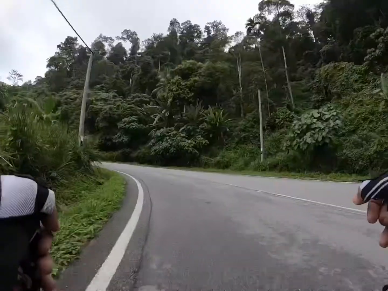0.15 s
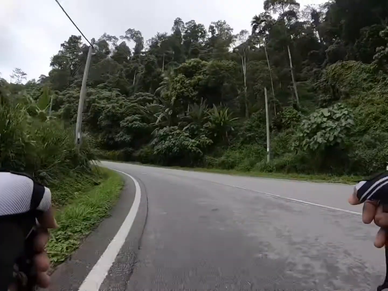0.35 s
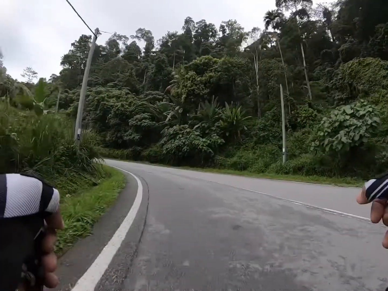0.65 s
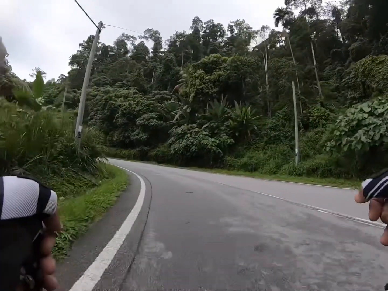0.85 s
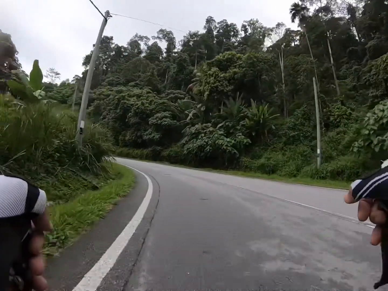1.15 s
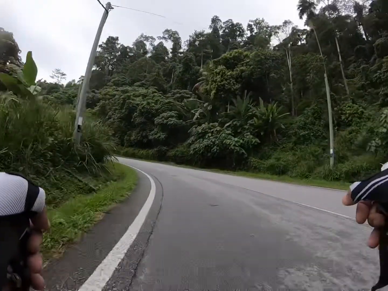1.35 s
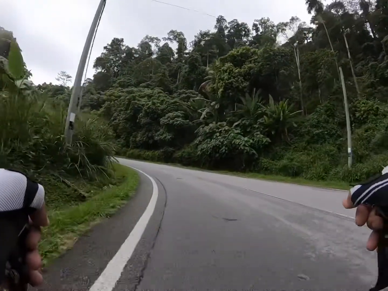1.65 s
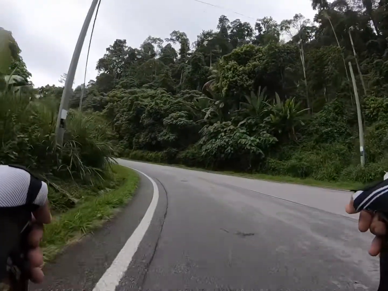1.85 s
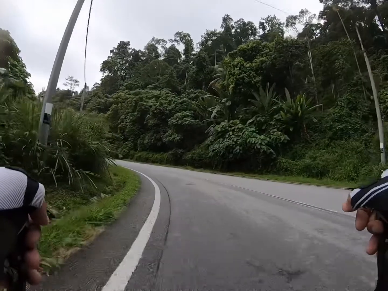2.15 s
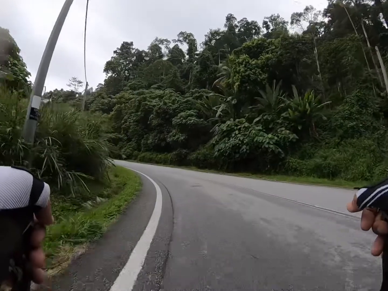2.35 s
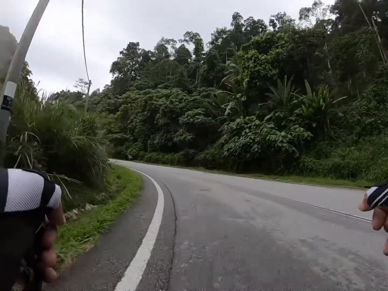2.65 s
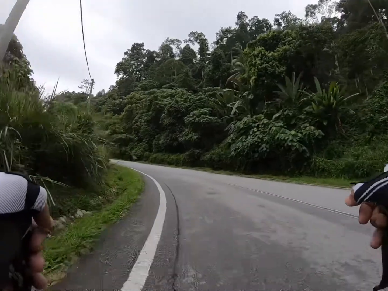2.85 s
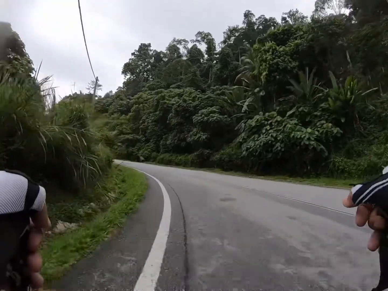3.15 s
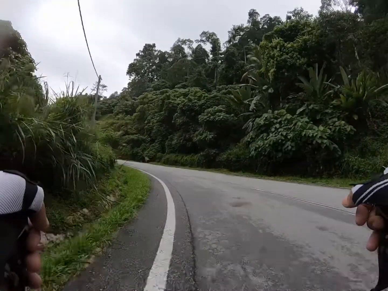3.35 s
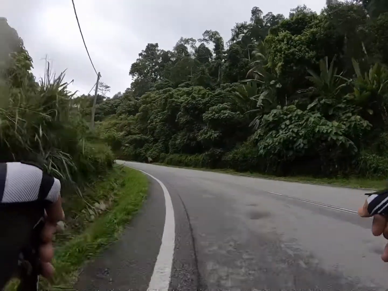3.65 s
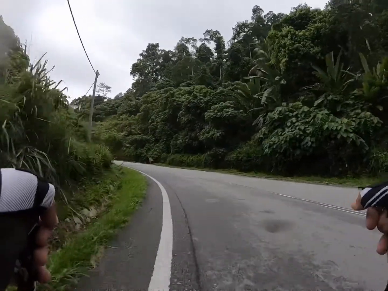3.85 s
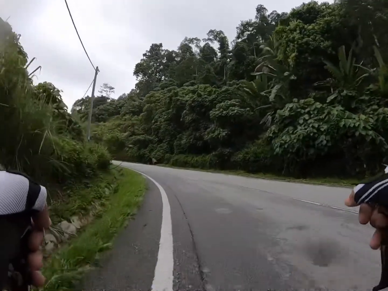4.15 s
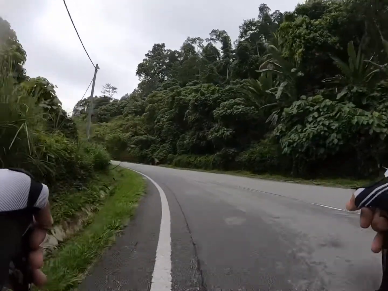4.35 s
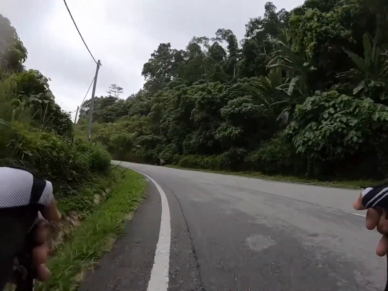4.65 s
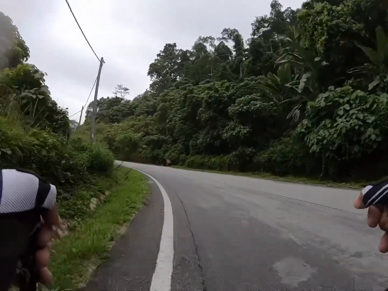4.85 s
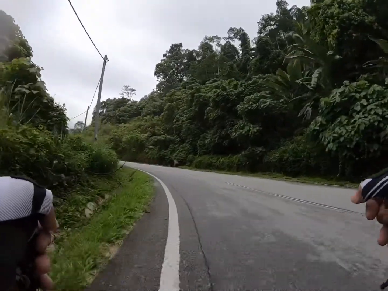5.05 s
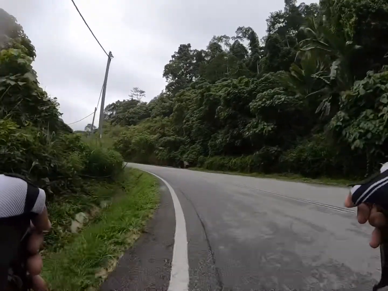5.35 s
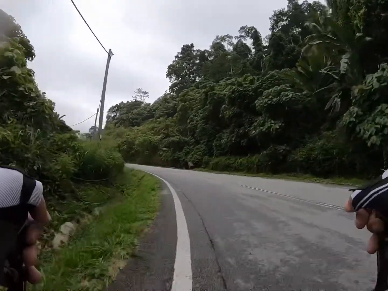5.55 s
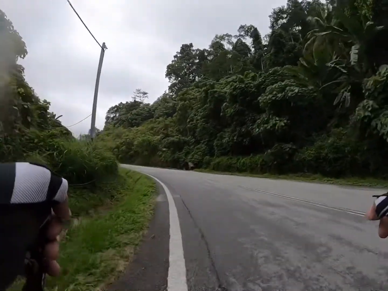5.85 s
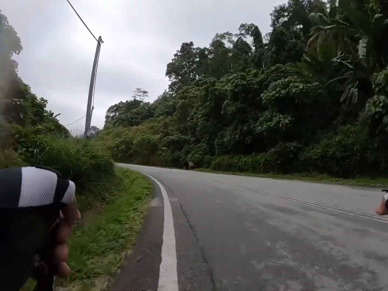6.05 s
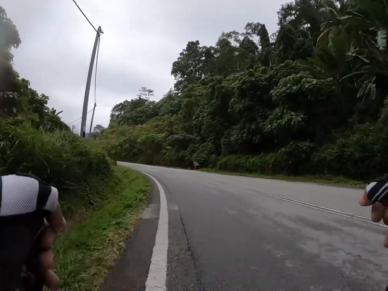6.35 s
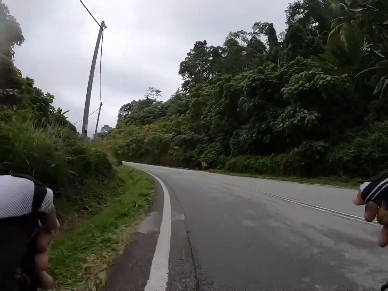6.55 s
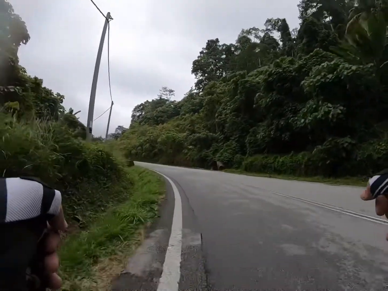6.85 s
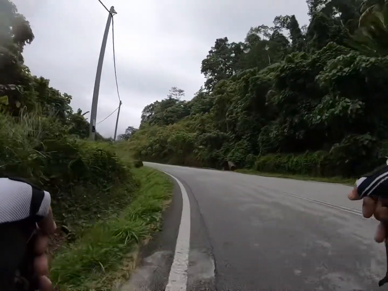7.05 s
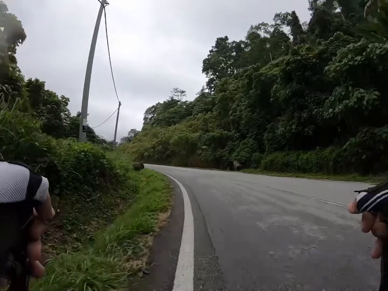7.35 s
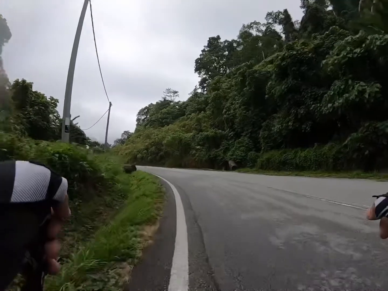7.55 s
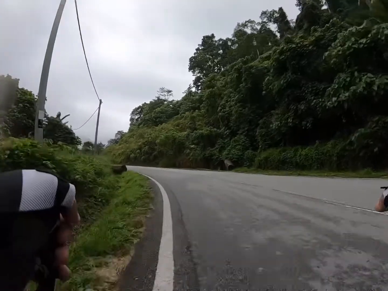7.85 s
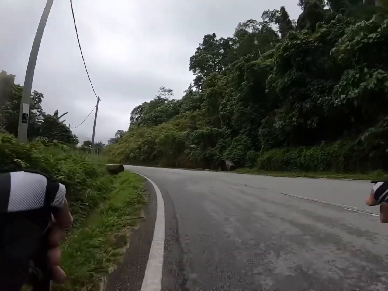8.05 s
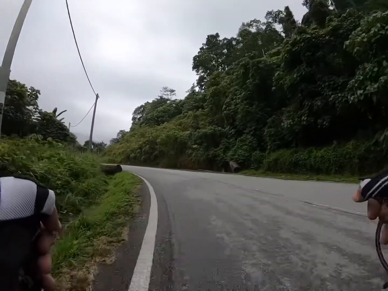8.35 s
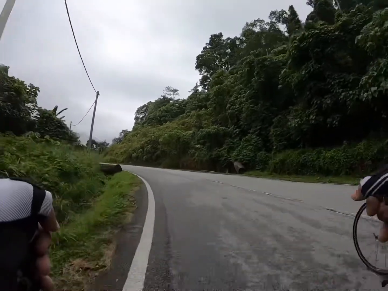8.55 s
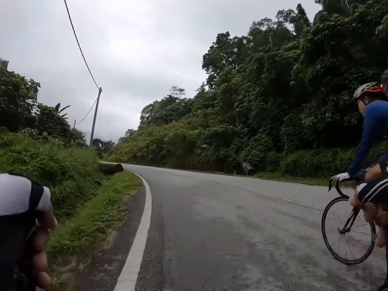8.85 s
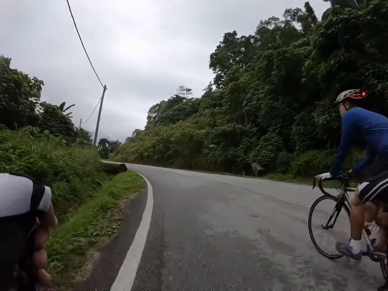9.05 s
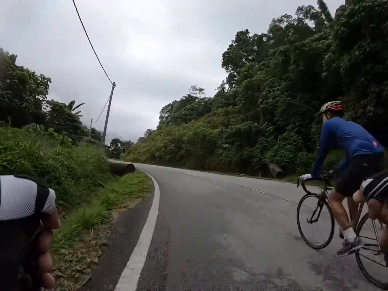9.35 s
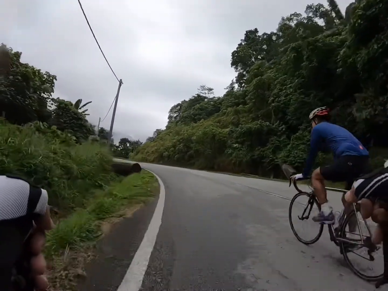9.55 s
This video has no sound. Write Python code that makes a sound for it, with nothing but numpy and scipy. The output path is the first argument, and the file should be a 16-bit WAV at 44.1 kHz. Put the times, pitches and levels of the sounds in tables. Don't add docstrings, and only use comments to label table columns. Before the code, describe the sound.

A camera fixed to a road bicycle hears a throbbing low hum from its mount, steady tyre roar on asphalt and headwind thumping the microphone, strongest in the first three seconds. A crank double click returns about every 0.9 seconds among irregular dull chain knocks. Faint insects buzz at the roadside, small bird chirps pass near the middle, and bright grit ticks grow more frequent later. Open forest road, very close mono sound.

```python
import sys
import numpy as np
from scipy import signal
from scipy.io import wavfile
from scipy.ndimage import uniform_filter1d

SR = 44100
rng = np.random.default_rng(int(sys.argv[2]) if len(sys.argv) > 2 else 0)


def convert_level_to_amplitude(level_db):
    exponent = np.asarray(level_db, float) / 20
    return 10 ** exponent


def generate_wav(sig):
    pcm = np.round(np.clip(np.atleast_2d(sig).T, -1, 1) * 32767).astype(np.int16)
    wavfile.write(sys.argv[1], SR, pcm)


N = 427769
T = np.arange(N) / SR


def evened(x):
    return x / np.sqrt(np.mean(abs(x) ** 2) + 1e-20)


def smoothed(x, size):
    return uniform_filter1d(uniform_filter1d(x, size), size)


def column(rows, order):
    rows = np.array(rows)
    return np.interp(T, rows[:, 0], rows[:, order])


def read(points, hz):
    f, value = np.transpose(points)
    return np.interp(np.log(hz + 1), np.log(f + 1), value)


def add(mix, s, sound):
    part = mix[round(s * SR):][:len(sound)]
    part += sound[:len(part)]


def bandpass(x, low_hz, high_hz):
    return signal.sosfilt(signal.butter(3, [low_hz, high_hz], "band", fs=SR, output="sos"), x)


def ring(modes, detune=1, rise=0.00022):
    t = T[:3000]
    x = 0
    for (hz, db, t60), d in zip(modes, detune * np.ones(len(modes))):
        x = x + convert_level_to_amplitude(db - 60 * t / t60) * np.sin(2 * np.pi * hz * d * t)
    x = x * (1 - np.exp(-(t / rise) ** 2))
    return x / abs(x).max()


def noise(colour_db, size, patchy_db, flicker_db):
    hz, frames = np.fft.rfftfreq(size, 1 / SR), 4 * N // size + 5
    a, b, patches = rng.standard_normal((frames, len(hz), 3)).T
    patches = evened(uniform_filter1d(uniform_filter1d(patches, 16, 0), 8, 1))
    flicker = evened(uniform_filter1d(rng.standard_normal(frames), 3))
    z = (a + 1j * b) * convert_level_to_amplitude(colour_db(hz)[:, None] + patchy_db * patches + flicker_db * flicker)
    return evened(signal.istft(z, nperseg=size, noverlap=3 * size // 4)[1][:N])


def swells(rows, idle_db, rise_s, fall_s, climb_db=0.):
    t, power = T[::32], 0
    for s, length, db in rows:
        shape = np.clip(np.minimum((t - s) / rise_s + .5, (s + length - t) / fall_s + .5), 0, 1)
        climb = climb_db * np.clip(2 * (t - s) / length - 1, -1, 1)
        power = power + (shape * convert_level_to_amplitude(db + climb)) ** 2
    return np.sqrt(convert_level_to_amplitude(idle_db) ** 2 + uniform_filter1d(np.interp(T, t, power), size=128))


def links_passed():
    s = np.array(CRANK_CLICKS)[:, 0]
    s = np.concatenate([[2 * s[0] - s[1]], s, [2 * s[-1] - s[-2]]])
    turns = np.interp(T, s, np.arange(len(s)))
    return 34 * turns + .8


# (start t/s, length t/s, level/dB)
CLAMP_SURGES = [(0, 0.033, -11.5), (.13, 0.046, -14.5), (.43, 0.14, -16.5), (.28, 0.037, -29),
                (.73, 0.069, -16), (.84, 0.057, -16), (.95, .06, -18), (1.16, 0.35, -28.5),
                (1.61, 0.17, -24), (1.92, 0.18, -19.5), (2.15, 0.042, -18), (2.31, 0.22, -18),
                (2.66, 0.043, -26), (2.79, 0.062, -18.5), (2.87, 0.054, -18), (3.07, 0.11, -20.5),
                (3.27, 0.17, -15.5), (3.42, 0.15, -23.5), (3.6, 0.24, -16), (3.92, 0.14, -17.5),
                (4.11, 0.18, -15.5), (4.34, 0.17, -19.5), (4.6, 0.24, -16.5), (4.9, 0.15, -18.5),
                (5.11, 0.239, -16), (5.445, 0.23, -17.5), (5.89, 0.24, -14.5), (6.15, 0.473, -17),
                (6.76, 0.31, -16), (7.12, 0.355, -17.5), (7.55, 0.25, -18), (7.87, 0.063, -15),
                (8.02, 0.29, -16.5), (8.35, 0.14, -22.5), (8.92, 0.138, -19), (9.3, 0.26, -20.5)]


def mount():
    pitch_hz, width_hz = 127.86, 17.0
    r = np.exp(-np.pi * width_hz / SR)
    shake = [1, 1j] @ rng.standard_normal((2, N))
    shake = evened(signal.lfilter([1], np.convolve([1, -r], [1, -r]), shake))
    shake = shake / (abs(shake) + 0.085) ** 0.56
    surge = swells(CLAMP_SURGES, idle_db=-26.5, rise_s=0.066, fall_s=0.0083, climb_db=1.5)
    swing = surge * evened(shake) * np.sqrt(2)
    swing = signal.sosfiltfilt(signal.butter(2, 36, fs=SR, output="sos"), swing)
    return (swing * np.exp(2j * np.pi * pitch_hz * T)).real


GUST_RISE_S, GUST_FALL_S = 0.013, 0.069
# (t/s, wind level/dB, reach to the case level/dB)
HEADWIND = [(0, -27, -31.5), (1.0, -26, -39.5), (1.7, -22, -37), (3.4, -24.5, -41.5), (3.65, -24, -43),
            (5.0, -22.5, -54.5), (5.5, -23.5, -43), (6.5, -25.5, -51.5), (7.9, -25.5, -49),
            (8.1, -28, -53.5), (9.7, -28.5, -39)]
# (start t/s, length t/s, level/dB)
AIR_LUMPS = [(.135, 0.056, -19), (.235, 0.072, -14.5), (.65, 0.086, -18.5), (1.27, .18, -25.5),
             (1.62, 0.17, -22), (2.44, 0.07, -21), (3.35, 0.08, -25), (5.07, .05, -22), (5.25, 0.11, -28),
             (5.33, 0.21, -19.5), (7.28, 0.11, -21.5), (7.61, 0.042, -18), (7.83, 0.22, -22),
             (9.17, .07, -23)]
# (f/Hz, level/dB per Hz)
WIND_COLOUR = [(8.8, -39), (15, -16), (43, 14), (86, 7), (100, 12), (130, -34), (220, -120)]


def wind():
    lumps = noise(lambda hz: read(WIND_COLOUR, hz), size=4096, patchy_db=-5.5, flicker_db=1.8)
    size = np.sqrt(abs(smoothed(lumps ** 2, 1800)))
    steady = evened(lumps / (size + 0.18) ** 0.87)
    return swells(AIR_LUMPS, column(HEADWIND, order=1), GUST_RISE_S, GUST_FALL_S) * steady


# (t/s, level/dB)
ASPHALT = [(0.0, -27.5), (0.1, -33.5), (1.59, -33), (1.65, -31), (1.84, -33.5), (3.65, -31.5),
           (4.59, -35.5), (4.62, -33.5), (8.05, -34.5), (8.21, -36), (9.56, -30.5), (9.7, -33)]
# (f/Hz, level/dB per Hz)
ROAR_COLOUR = [(90, -2.5), (150, 0), (200, -14.5), (260, -23.5), (520, -22), (1100, -28), (1700, -33.5),
               (3400, -39.5), (5600, -44.5), (7000, -45.5), (9500, -58), (10500, -77), (13000, -89.5),
               (16000, -118)]
# (f/Hz, width f/Hz, lift or dip level/dB)
FRAME_MODES = [(304, 69, 4), (313.3, 66, 9), (389.7, 59, 17.5), (420, 8.6, 2.5), (454.8, 46, 22.5),
               (578.7, 38, 11), (604, 13, -6.5), (710, 96, 7.5), (916, 130, 9), (1094, 82, -6),
               (1248, 110, 10), (1477, 20, 6.5), (1920, 170, 2.5), (2700, 52, 4), (3700, 140, 2),
               (4515, 260, 5), (6230, 110, 7.5), (6870, 300, -18), (7900, 240, 2), (8950, 200, 1.5)]


def road():
    def colour_db(hz):
        bumps = sum(db / (1 + (2 * (hz - f) / w) ** 2) for f, w, db in FRAME_MODES)
        return read([(40, -51.5)] + ROAR_COLOUR, hz) + bumps
    roar = noise(colour_db, size=4096, patchy_db=1.37, flicker_db=0.86)
    return convert_level_to_amplitude(column(ASPHALT, order=1) + 3.0) * roar


# (f/Hz, level/dB, t60 t/s)
LINK_MODES = [(1358, 5.5, 0.017), (1800, -1.5, 0.015), (2080, -3, 0.021), (2750, -9, 0.046),
              (3003, -7, 0.044), (3630, -9.5, 0.039), (4620, -8.5, 0.014), (5860, -10, 0.022),
              (9100, -22, 0.0098)]
# (t/s, level/dB)
CHAIN_TENSION = [(0, -59), (.66, -60.5), (2.0, -59.5), (3.0, -58.5), (3.4, -62), (8.0, -62), (8.4, -61.5),
                 (9.7, -58.5)]


def chain_links():
    at = np.flatnonzero(np.diff(np.floor(links_passed())) > 0).repeat(3)
    size, late, kind = rng.random((len(at), 3)).T
    out = np.zeros(N)
    for k in range(8):
        train, mine = np.zeros(N + 900), (8 * kind).astype(int) == k
        train[at[mine] + (340 * late[mine] ** 2).astype(int)] = convert_level_to_amplitude(10. * size[mine])
        modes = [(hz, db + 15.0 * rng.random(), t60) for hz, db, t60 in LINK_MODES]
        knock = ring(modes, rng.uniform(.94, 1.06, len(LINK_MODES)), rise=.0005)
        out += signal.oaconvolve(train, knock)[:N]
    return convert_level_to_amplitude(column(CHAIN_TENSION, order=1) + 6.5) * evened(out)


# (start t/s, length t/s, level/dB)
PLATE_RUBS = [(0, 0.056, -56), (.33, 0.088, -61), (4.35, .06, -57), (5.17, 0.28, -74), (1.0, 0.3, -55.5),
              (2.1, 0.33, -60), (3.3, 0.2, -52.5), (4.58, 0.2, -55.5), (5.7, 2.7, -64.5),
              (8.05, 0.21, -57.5), (8.85, 0.23, -52.5), (9.45, 0.38, -62)]


def chain_rub():
    def colour_db(hz):
        return -20 * np.log10(1 + ((hz - 2900) / 300) ** 2)
    rub = noise(colour_db, size=512, patchy_db=1.5, flicker_db=1.5)
    pulse = 0.92 + 0.92 * np.cos(np.pi * (links_passed() - .12)) ** 6
    return swells(PLATE_RUBS, idle_db=-76.5, rise_s=0.28, fall_s=0.17) * rub * pulse


# (t/s, level/dB)
SAND = [(0, -80), (1.1, -82), (1.3, -85), (1.75, -86), (1.92, -97), (2.3, -87), (2.5, -95), (2.7, -88),
        (3.2, -87.5), (3.9, -81), (4.15, -83.5), (4.4, -92), (4.55, -81.5), (5.8, -85), (6.05, -78),
        (8.3, -78), (8.7, -81.5), (9.7, -76.5)]


def spray():
    colour = [(6000, -60), (8500, -10), (10300, -2), (11500, -6), (13300, -12), (14400, -21),
              (15300, -40), (16000, -80)]
    hiss = noise(lambda hz: read(colour, hz), size=1024, patchy_db=2., flicker_db=3.)
    return convert_level_to_amplitude(column(SAND, order=1) + 3.5) * hiss


# (f/Hz, width f/Hz, pulse rate f/Hz, mid-buzz pitch rise f/Hz, unsteadiness,
# share of clean tone)
INSECT_KINDS = [
    (11600, 1800, 150, 500, .08, 0),
    (9050, 800, 140, 0, .012, 1.2),
    (4500, 400, 90, 0, .03, 0),
    (10500, 300, 140, 0, .05, 0),
    (10900, 500, 150, 1400, .08, 0),
    (8950, 800, 120, 100, .04, 0),
]
# (start t/s, end t/s, level/dB, kind)
BUZZES = [(.05, .38, -77, 0), (.52, .66, -73, 1), (.63, .755, -68, 1), (.55, .72, -79, 3),
          (.8, 1.03, -79, 4), (.8, 1.05, -81, 0), (.43, .53, -78, 0), (2.2, 2.45, -73, 5),
          (3.08, 3.38, -70, 5), (3.96, 4.05, -76, 5), (6.2, 6.4, -75, 5), (5.8, 5.97, -65, 2),
          (0, 3.6, -63.5, 2), (7.4, 8.6, -70, 2), (8.15, 8.19, -60, 2)]


def insects():
    out = np.zeros(N)
    for start, end, db, kind in BUZZES:
        hz, width, rate, arch_hz, jitter, clean = INSECT_KINDS[kind]
        t = T[:round((end - start) * SR)]
        low = signal.butter(3, width / 2, fs=SR, output="sos")
        band = signal.sosfilt(low, rng.standard_normal((2, len(t))))
        turn = 2 * np.pi * np.cumsum(hz + arch_hz * np.sin(np.pi * t / t[-1])) / SR
        band = (band[0] + clean * band.std()) * np.cos(turn) + band[1] * np.sin(turn)
        stray = jitter * np.cumsum(rng.standard_normal(len(t)))
        pulses = 0.39 + np.cos(2 * np.pi * rate * t + stray)
        add(out, start, convert_level_to_amplitude(db) * evened(band * pulses) * signal.windows.tukey(len(t), .3))
    return out


# (start t/s, length t/s, level/dB)
CASE_SLAPS = [(.014, 0.19, -37), (.13, 0.043, -27), (.235, 0.04, -23.5), (.55, .03, -39), (.78, .08, -29),
              (1.355, .03, -31), (1.44, 0.037, -32.5), (1.61, 0.046, -29), (1.685, 0.027, -38),
              (2.1, 0.09, -37), (2.49, .03, -36), (2.57, 0.036, -32.5), (3.1, 0.035, -32),
              (4.2, 0.083, -39), (4.5, 0.11, -42), (6.11, 0.026, -34), (2.815, .03, -30.5),
              (.975, 0.038, -26), (1.13, .07, -27), (1.28, 0.063, -28), (1.76, .15, -34),
              (1.96, 0.13, -31.5), (2.3, .15, -30.5), (2.78, .04, -30), (2.9, 0.084, -24),
              (3.17, 0.39, -33), (5.31, 0.092, -38), (5.42, 0.079, -26), (5.94, 0.025, -33),
              (7.68, 0.07, -41), (8.925, 0.049, -29), (9.385, 0.077, -28), (9.525, 0.047, -39)]


def buffet():
    colour = [(60, -27.5), (150, 19.0), (215, 2.0), (290, -4.0), (500, -17), (1500, -110)]
    slaps = noise(lambda hz: read(colour, hz), size=1024, patchy_db=0.0, flicker_db=3.0)
    gain = swells(CASE_SLAPS, column(HEADWIND, order=2), GUST_RISE_S, GUST_FALL_S)
    return convert_level_to_amplitude(3.5) * gain * slaps


# (t/s, peak level/dB)
GRIT_TICKS = [(.127, -58), (.8195, -59.5), (2.591, -56), (3.1193, -56), (3.7748, -53), (4.5501, -56),
              (4.57, -56.5), (6.59, -51), (6.665, -57), (7.1342, -55.5), (7.3312, -52), (7.3547, -54.5),
              (7.4599, -53), (7.4974, -54.5), (7.815, -60), (7.858, -56), (8.04, -60), (8.098, -53),
              (8.128, -59), (8.1673, -55), (8.186, -59.5), (8.6971, -56.5), (9.0214, -54.5), (9.3177, -53),
              (9.3901, -54), (1.026, -53), (1.1727, -56), (2.784, -48.5), (3.4266, -46), (3.4445, -47.5),
              (3.686, -49), (3.7155, -46.5), (4.5161, -50), (5.021, -64), (5.3852, -59), (5.7139, -55),
              (6.0806, -53.5), (6.1689, -49), (6.339, -51.5), (6.738, -52.5), (6.8577, -51.5),
              (6.9554, -50), (7.0616, -57), (7.1713, -53), (7.212, -50.5), (7.3153, -56.5), (7.39, -49),
              (7.7146, -51), (7.912, -52.5), (8.9146, -48), (9.2798, -52), (9.426, -48), (9.4728, -41.5),
              (9.5178, -52)]


def grit():
    out, t = np.zeros(N), T[:1200]
    snaps = bandpass(rng.standard_normal((len(GRIT_TICKS), len(t))), 5000, 11000)
    for (s, db), hz, snap in zip(GRIT_TICKS, rng.uniform(7100, 9300, len(GRIT_TICKS)), snaps):
        modes = [(hz, 0, .013), (1.4 * hz, -12, .006), (1.0 * hz, -4, .008), (0.97 * hz, -4, .006),
                 (0.64 * hz, -6, .006)]
        add(out, s, convert_level_to_amplitude(db - 2.5) * ring(modes, rise=0.00074))
        add(out, s, convert_level_to_amplitude(db - 3.5 - 1400 * t) * snap * np.minimum(t / 0.00092, 1))
    return out


# (t/s, peak level/dB, f/Hz)
CHAIN_KNOCKS = [(0.344, -35, 3020), (0.371, -41.5, 3000), (.396, -37.5, 3000), (.421, -37, 2930),
                (0.8167, -33.5, 3550), (0.9924, -33, 2750), (1.1703, -37, 2680), (1.2206, -39, 2750),
                (1.476, -37.5, 3700), (1.625, -32, 3700), (2.1316, -36, 2920), (2.798, -49, 1960),
                (3.1209, -29.5, 1980), (3.4262, -26.5, 3140), (3.443, -29, 1670), (3.7264, -30.5, 1740),
                (3.762, -32.5, 1990), (4.383, -36, 2700), (4.7052, -45, 2800), (5.1167, -37.5, 3620),
                (5.1852, -45, 1840), (5.255, -31.5, 2600), (5.5882, -31, 3570), (5.6241, -33, 2080),
                (6.8647, -30, 2020), (8.1223, -37, 1700), (9.031, -35, 1800), (9.2848, -39, 1990),
                (9.427, -32, 2880), (.149, -36, 1510), (0.8676, -34, 1600), (1.5747, -38, 2900),
                (1.725, -38, 2900), (1.93, -39, 3000), (2.0038, -43.5, 2900), (2.0303, -43.5, 2800),
                (2.0542, -38, 2800), (2.1034, -35.5, 2820), (2.156, -38, 2010), (2.5362, -40, 1960),
                (2.8228, -42.5, 1880), (2.8444, -40.5, 2260), (2.9751, -39, 2000), (3.2136, -37.5, 3690),
                (3.2365, -40, 2500), (3.6745, -39, 1910), (3.8292, -40, 1850), (4.625, -39.5, 3230),
                (4.655, -42, 2700), (4.7282, -48, 2800), (4.7511, -46, 1900), (5.305, -41, 3000),
                (6.455, -41, 2800), (6.61, -43, 2950), (6.665, -46.5, 2900), (6.691, -52, 1490),
                (6.7366, -44.5, 4640), (8.1569, -32.5, 2500), (8.982, -33, 2960), (9.333, -41, 1900)]


def knocks():
    out, t = np.zeros(N), T[:1200]
    rattles = bandpass(rng.standard_normal((len(CHAIN_KNOCKS), len(t))), 1800, 4200)
    for (s, db, hz), rattle in zip(CHAIN_KNOCKS, rattles):
        modes = [(hz, 0, .024), (0.68 * hz, -7, .012), (1.3 * hz, -7, .012), (1.4 * hz, -9, .01),
                 (1.6 * hz, -14, .008)]
        add(out, s, convert_level_to_amplitude(db - 3.5) * ring(modes, rise=0.00073))
        add(out, s, convert_level_to_amplitude(db - 5.0 - 490 * t) * rattle * signal.windows.tukey(len(t), .05))
    return out


# (f/Hz, level/dB, t60 t/s)
CLICK_MODES = [(1980, 0, .016), (2150, -5, .014), (3165, -13, .012), (3790, -6, .024), (6150, -19, .014),
               (8250, -17, .014), (9000, -17, .013), (11000, -30, .01)]
# (f/Hz, level/dB, t60 t/s)
SEAT_MODES = [(1960, -2.5, 0.048), (2150, -2.5, 0.029), (3760, -10.5, 0.028)]
# (t/s, peak level/dB, second click against the first level/dB, brightness level/dB)
CRANK_CLICKS = [(0.4631, -27.5, -7, 0.5), (1.317, -28, -7, 0), (2.176, -27.5, -5.5, 1),
                (3.049, -27.5, -6, 1), (3.924, -30.5, -11, 1), (4.8015, -32, -9, 5.5), (5.6753, -29, -8, 2),
                (6.5525, -31.5, -8, 2), (7.4192, -33, -8, 2), (8.269, -35, -3, 6), (9.1255, -31, -2, 6)]


def crank():
    out, t = np.zeros(N), T[:1500]
    scrapes = rng.standard_normal((len(CRANK_CLICKS), len(t)))
    scrapes = signal.lfilter([1, 1.1, -.8, -.9], [1, -.85, .13], scrapes)
    scrape_shape = np.minimum(t / .001, 1) * np.cos(np.linspace(0, np.pi / 2, len(t)))
    draws = rng.random((len(CRANK_CLICKS), 20))
    for (s, db, second_db, bright_db), draw, scrape in zip(CRANK_CLICKS, draws, scrapes):
        struck = [(hz, level + 3.8 * (d - .5) + bright_db * (hz > 5000), t60)
                  for (hz, level, t60), d in zip(CLICK_MODES, draw[8:16])]
        add(out, s, convert_level_to_amplitude(db + 1.0) * ring(struck, .98 + 0.036 * draw[:8], rise=0.00096))
        seated = ring(SEAT_MODES, .98 + 0.069 * draw[8:11], rise=.002)
        add(out, s + 0.011, convert_level_to_amplitude(db + second_db) * seated)
        add(out, s, convert_level_to_amplitude(db - 38.5 - 290 * t) * scrape * scrape_shape)
        for late in draw[13:]:
            detune = 0.71 + 0.18 * (draw[5:13] + late) % .2
            add(out, s + 0.0061 + 0.014 * late, convert_level_to_amplitude(db - 10.5) * ring(CLICK_MODES, detune, rise=0.0014))
    return out


def ping():
    out = np.zeros(N)
    modes = [(10600, -7, .006), (12200, 3, .006), (13000, -2, .005), (13900, -1, .005),
             (14800, -3.5, .005), (15400, -8.5, .004)]
    add(out, .7706, convert_level_to_amplitude(-55.5) * ring(modes))
    return out


# (t/s, first level/dB, second level/dB)
PAIRED_CHIRPS = [(4.27, -70, -61), (4.518, -56, -55), (4.735, -70, -59), (4.772, -55, -55),
                 (4.985, -70, -61), (5.026, -58, -54), (5.285, -57, -58), (5.5, -70, -60),
                 (5.543, -53, -55), (5.72, -70, -58), (5.8, -52, -51)]
# (delay t/s, level/dB)
HILLSIDE = [(0, 1), (.006, -11), (.014, -10), (.026, -15)]


def bird():
    out = np.zeros(N)
    top_hz, low_hz, wobble_hz, chirp_s, pair_s = 5550, 4400, 25, .028, .044
    pairs = [(s + k * pair_s, db) for s, *both in PAIRED_CHIRPS for k, db in enumerate(both)]
    for (s, db), (high, long) in zip(pairs, rng.uniform(.98, 1.03, (len(pairs), 2))):
        hz = high * np.linspace(top_hz, low_hz, round(long ** 4 * chirp_s * SR))
        hz = hz + wobble_hz * evened(uniform_filter1d(rng.standard_normal(len(hz)), size=90))
        waver_db = 2.9 * evened(smoothed(rng.standard_normal(len(hz)), 50))
        note = convert_level_to_amplitude(db - 1.5 + waver_db) * np.sin(2 * np.pi * np.cumsum(hz) / SR)
        note = note * signal.windows.tukey(len(hz), .6)
        for late, echo_db in HILLSIDE:
            add(out, s + late * long ** 10, convert_level_to_amplitude(echo_db) * note)
    return out


def scene():
    bicycle = mount() + road() + chain_links() + chain_rub() + crank() + knocks() + ping()
    air = wind() + buffet()
    tyre_debris = spray() + grit()
    verge = insects() + bird()
    return (bicycle + air + tyre_debris + verge)[None]


def band_limit(x):
    return signal.sosfilt(signal.butter(12, 15220, fs=SR, output="sos"), x)


def record(dry):
    step_s, step_db = .0393, -18
    step = convert_level_to_amplitude(step_db) * np.exp(-np.maximum(T - step_s, 0) / .002) * (T >= step_s)
    x = dry - step
    x = x * np.minimum((T[-1] - T) / .004, 1)
    power = uniform_filter1d(x ** 2, 900, axis=1)
    x = x / (1 + (power / 0.068) ** 2) ** 0.14
    x = x / (1 + (x / .48) ** 6) ** (1 / 6)
    return band_limit(x)


dry = scene()
out = record(dry)
generate_wav(out)
```